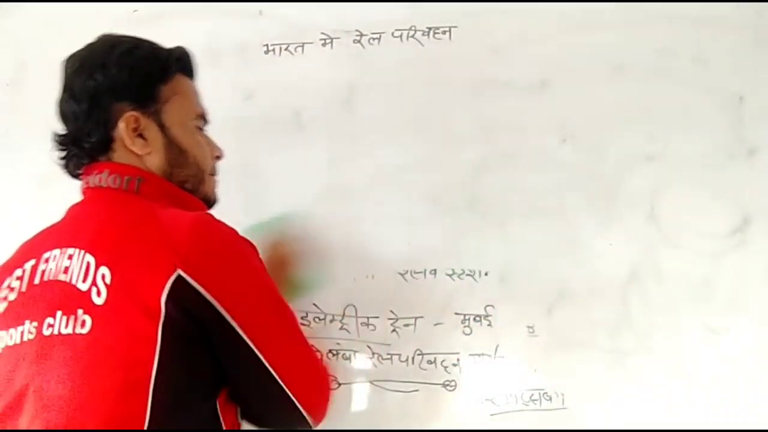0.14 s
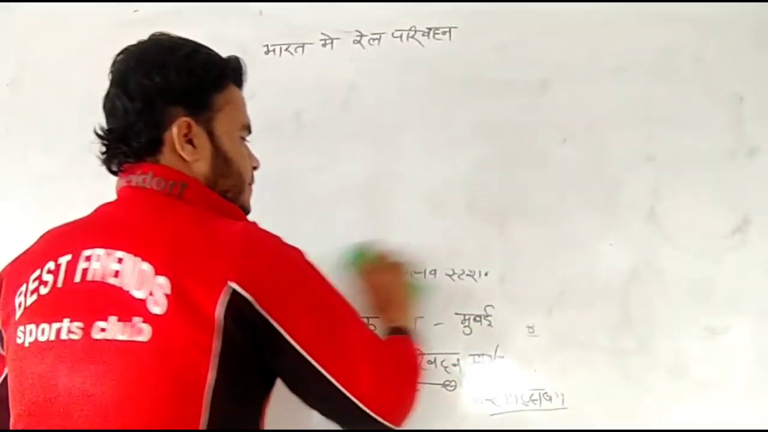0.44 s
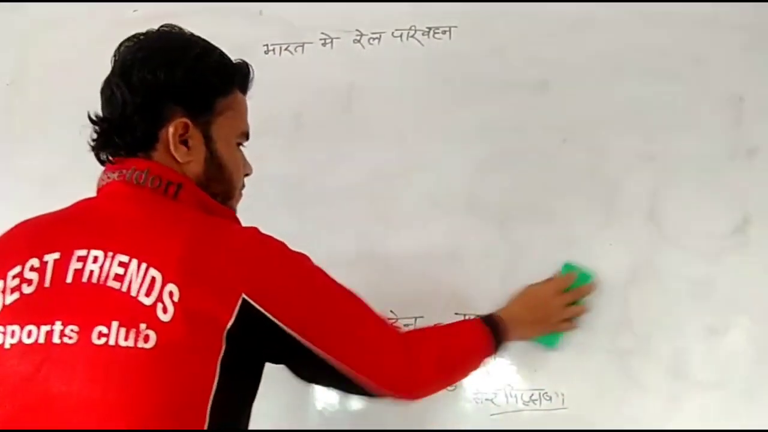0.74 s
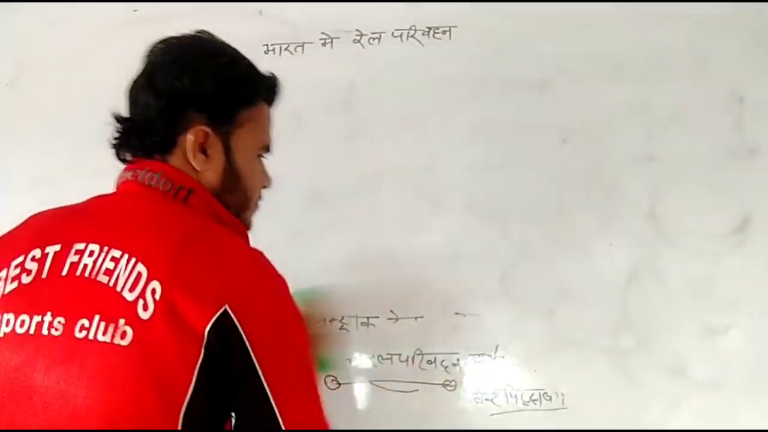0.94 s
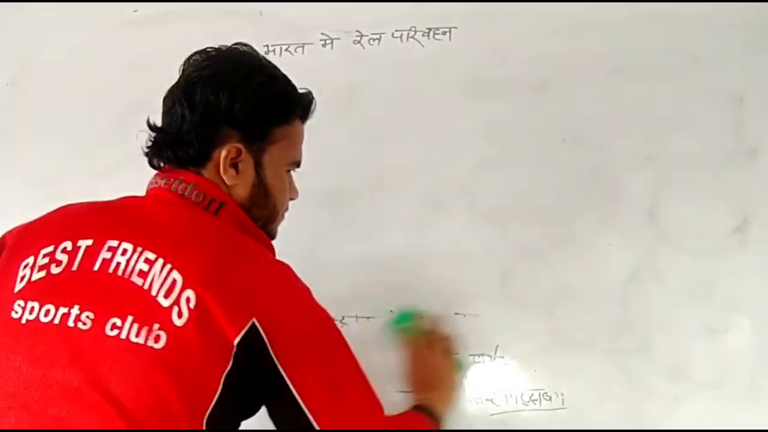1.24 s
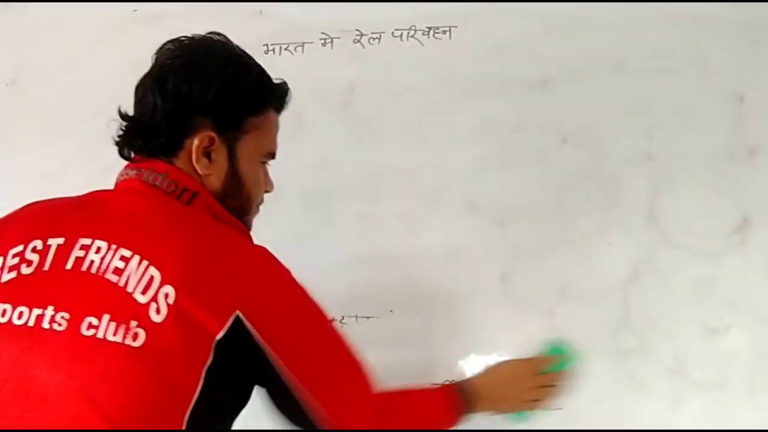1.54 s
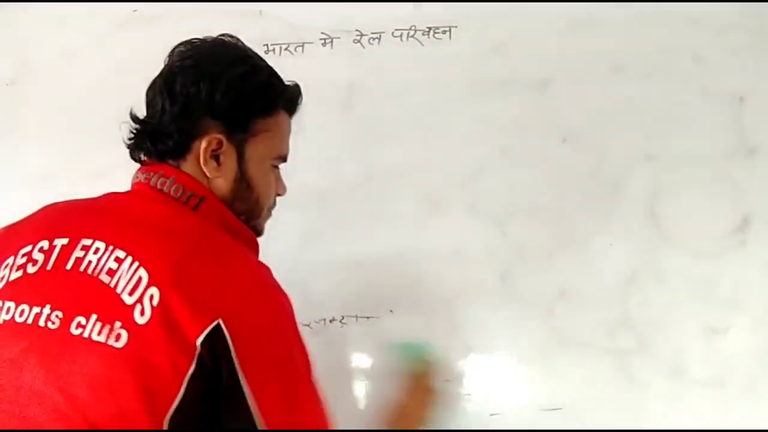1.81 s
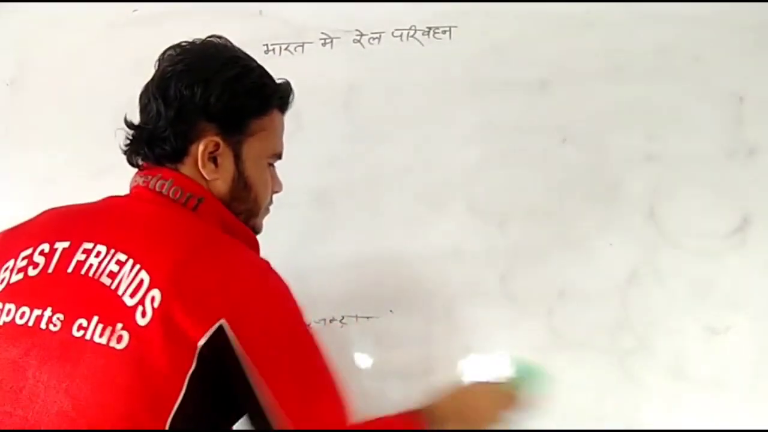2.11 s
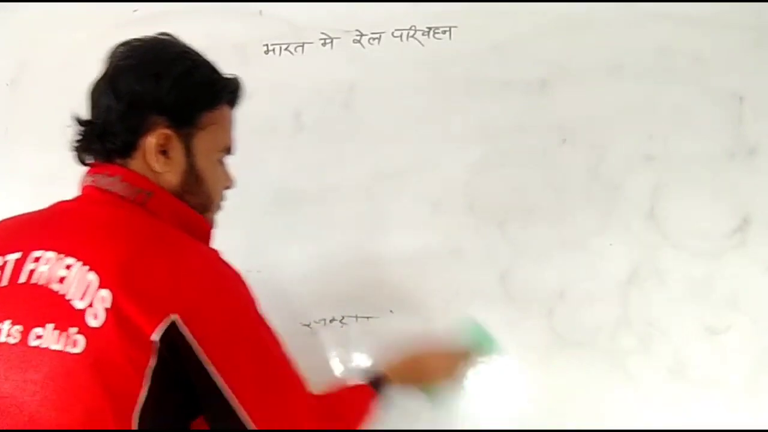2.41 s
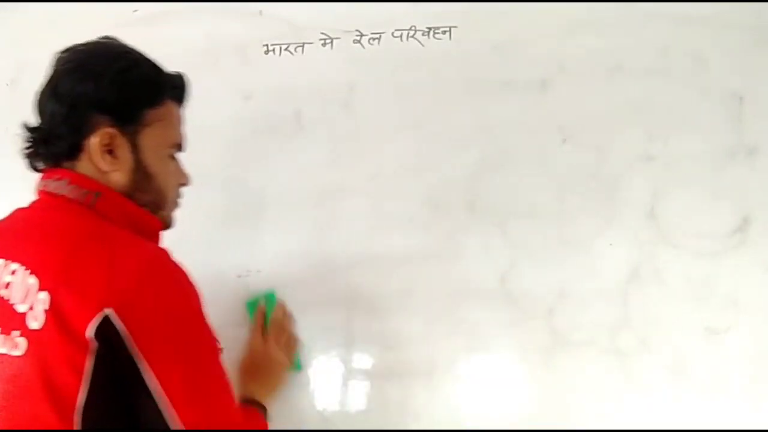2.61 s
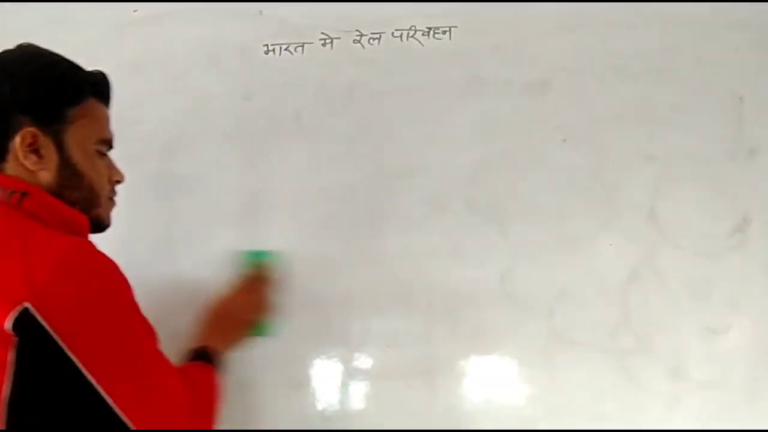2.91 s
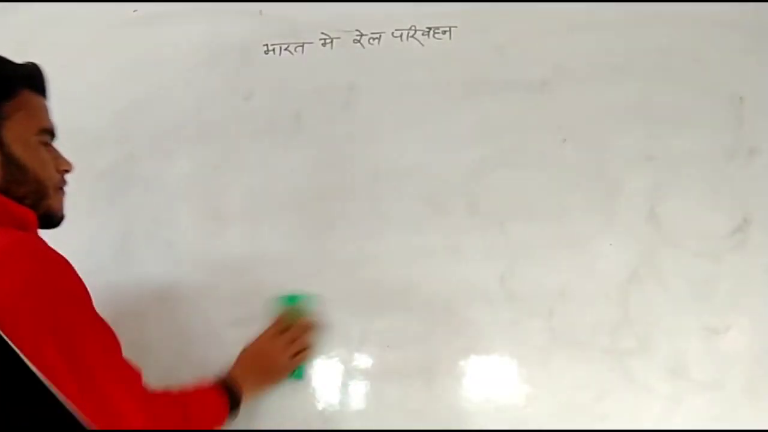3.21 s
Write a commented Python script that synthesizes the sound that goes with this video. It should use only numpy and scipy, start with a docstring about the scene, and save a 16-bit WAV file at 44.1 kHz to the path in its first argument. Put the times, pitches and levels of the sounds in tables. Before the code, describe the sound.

An eraser rubs back and forth on a whiteboard with light knocks at the turns.

```python
"""Erasing a whiteboard

A felt eraser is wiped back and forth in a small classroom. Friction noise swells and fades with the
speed of the hand: fibres catch and hiss, and the panel rumbles under them. The plastic holder knocks
at the turns, and gripping felt scuffs, squeaks and judders. Beneath it all lie a steady room tone
and moving air that buffets the microphone."""
import sys
import numpy as np
from scipy import signal
from scipy.fft import rfft, irfft
from scipy.io import wavfile
from scipy.ndimage import uniform_filter1d

SR = 44100
rng = np.random.default_rng(int(sys.argv[2]) if len(sys.argv) > 2 else 0)


def generate_wav(signal):
    """Clip the signal to [-1, 1] and save it as 16-bit WAV at the path in sys.argv[1]."""
    frames = np.transpose(np.atleast_2d(signal))
    scaled = np.clip(frames, -1, 1) * 32767
    pcm = np.round(scaled).astype(np.int16)
    wavfile.write(sys.argv[1], SR, pcm)


N = 147735


def undb(db):
    """Decibels to amplitude ratio."""
    return 10 ** (np.asarray(db) / 20)


def unit(x):
    """Normalise to an rms of 1."""
    return x / np.sqrt(np.mean(x ** 2))


def noise():
    """Gaussian white noise."""
    return rng.standard_normal(N)


def colour(x, points):
    """Spectral shaping by (frequency [Hz], gain [dB]) points; rms 1."""
    hz, db = np.array(points).T
    f = np.maximum(np.arange(N // 2 + 1) * SR / N, 1)
    gain = undb(np.interp(np.log(f), np.log(hz), db))
    return unit(irfft(rfft(x) * gain, N))


def resonance(x, hz, width_hz):
    """Two resonators in cascade give a steep-sided peak; rms 1."""
    b, a = signal.iirpeak(hz, hz / width_hz / np.sqrt(2), SR)
    return unit(signal.lfilter(b, a, signal.lfilter(b, a, x)))


def wander(per_s):
    """Linear interpolation between random values; rms 1."""
    hold = int(SR / per_s)
    steps = np.repeat(rng.standard_normal(N // hold + 1), hold)
    return unit(uniform_filter1d(steps, hold))[:N]


def swell(t, middle, half):
    """A Gaussian envelope."""
    return np.exp(-((t - middle) / half) ** 2 / 2)


def impact(t, at, decay_s, rise_s=0.00045):
    """A struck body's vibration builds during contact, then decays exponentially."""
    age = np.maximum(t - at, 0)
    return (1 - np.exp(-age / rise_s)) * np.exp(-age / decay_s)


def slips(per_s, spread_db):
    """Microscopic stick-slip: a Poisson train of impulses of random sign and size."""
    impulses = (rng.random(N) < per_s / SR) * np.sign(noise())
    size = np.minimum(rng.exponential(size=N), 2 * np.pi / np.sqrt(2))
    return impulses * undb(spread_db * size)


def wiping(t, turn_drop_db=24, swell_power=2.44, panel_share=0.46):
    """Sliding friction grows with speed: fibres hiss and excite the resonances of pad and panel."""
    # Hand strokes (start [s], fastest [s], end [s], hiss [dB], pad level [dB], pad resonance [Hz],
    # panel rumble [dB], panel ring [dB])
    strokes = [(-.2, -.06, 0.15, -62.5, -66.5, 4030, -51, -57.5),
               (.092, 0.229, 0.36, -52.5, -56.5, 4290, -53.5, -58),
               (0.365, 0.44, 0.92, -56.5, -71, 5460, -55, -59.5),
               (0.447, 0.573, .74, -63, -56, 4040, -58.5, -68),
               (0.902, 1.043, 1.16, -55, -58.5, 4240, -55, -61.5),
               (1.059, 1.32, 1.59, -57, -58.5, 3870, -58, -72),
               (1.628, 1.79, 1.89, -55, -61, 3840, -64.5, -74.5),
               (1.853, 1.947, 2.1, -54.5, -59, 3580, -60, -72.5),
               (2.139, 2.307, 2.3, -52.5, -57.5, 4120, -56.5, -71),
               (2.32, 2.414, 2.455, -62, -60.5, 3900, -68, -68),
               (2.461, 2.602, 2.77, -51, -56, 4080, -54.5, -68),
               (2.727, 2.845, 2.93, -62.5, -61, 4200, -62.5, -68),
               (2.883, 3.022, 3.233, -52.5, -58, 4400, -55.5, -69),
               (3.19, 3.302, 3.37, -60, -61.5, 4113, -63, -70)]
    # Spectrum of the fibre hiss (frequency [Hz], relative level [dB])
    felt_spectrum = [(900, -8.5), (1700, -3), (2100, -12), (2450, -11.5), (2900, -4.5), (3400, 3),
                     (4300, -5.5), (5300, 3), (6200, 1.5), (6800, 1), (7400, 0.5), (8000, -2.5)]
    # Response of the panel (frequency [Hz], relative level [dB])
    panel_spectrum = [(60, -10), (150, -3), (260, 0), (320, -2.5), (380, 4), (480, 0.5), (620, -5),
                      (730, -4), (900, -10.5), (1200, -9.5), (1800, -13), (2500, -16), (4000, -22)]
    fibres = colour(slips(per_s=14000, spread_db=3), felt_spectrum)
    pad, hiss_power, rumble_power, ring_power = np.zeros((4, N))
    for start, fastest, end, hiss_db, pad_db, pad_hz, rumble_db, ring_db in strokes:
        rise_s, fall_s = max(fastest - start, 0.01), max(end - fastest, 0.01)
        toward_turn = np.where(t < fastest, (fastest - t) / rise_s, (t - fastest) / fall_s)
        speed_db = -turn_drop_db * toward_turn ** swell_power
        hiss_power += undb(hiss_db + speed_db) ** 2
        rumble_power += undb(rumble_db + panel_share * speed_db) ** 2
        ring_power += undb(ring_db + panel_share * speed_db) ** 2
        pad += undb(pad_db + speed_db) * resonance(noise(), pad_hz, width_hz=1240)
    hiss = np.sqrt(hiss_power) * fibres
    rumble = np.sqrt(rumble_power) * colour(slips(per_s=770, spread_db=-1), panel_spectrum)
    grip = wander(per_s=70)  # uneven grip: hiss and rumble flutter in opposite directions
    ring = np.sqrt(ring_power) * resonance(noise(), hz=726.3, width_hz=40)
    return (pad + hiss) * undb(0.83 * grip) + rumble * undb(-0.5 * grip) + ring


def classroom(x, t, t60_s=0.44, tail_db=-8.5, delay_s=0.0039):
    """Reverberation: reflections from bare walls add a diffuse, exponentially decaying tail."""
    tail = noise() * undb(-60 * t / t60_s) * (t > delay_s)
    tail /= np.sqrt(np.sum(tail ** 2))
    return x + undb(tail_db) * signal.fftconvolve(x, tail)[:N]


def room_tone(level_db=-49.5):
    """Stationary background noise, strongest in the bass."""
    # Spectrum of the background (frequency [Hz], relative level [dB])
    spectrum = [(45, 10), (70, 11.5), (100, 2), (170, 1.5), (260, -0.5), (310, -3.5), (380, -5), (550, -8),
                (720, -6.5), (1050, -15.5), (1900, -15.5), (2600, -21), (4000, -25), (8000, -26.5)]
    return undb(level_db) * colour(noise(), spectrum)


def air(t, steady_db=-37.5):
    """Turbulence: slow, largely infrasonic pressure fluctuations buffet the microphone."""
    # Spectrum of the buffeting (frequency [Hz], relative level [dB])
    spectrum = [(2, -27.5), (5, 0.5), (8, 1), (14, -2), (25, -15.5), (35, -15.5), (50, -22.5), (80, -43.5),
                (160, -69.5)]
    # Gusts (centre [s], half length [s], rise above the steady air [dB])
    gusts = [(0.33, 0.069, 13.5), (1.08, 0.1, 10.5), (2.193, .14, 8), (2.572, 0.061, 4), (3.058, 0.026, 4)]
    gust_db = sum(db * swell(t, at, half) for at, half, db in gusts)
    return colour(noise(), spectrum) * undb(steady_db + gust_db)


def ticks(t):
    """Brief contacts of the holder's edge radiate dry, broadband transients."""
    # Edge contacts (time [s], level [dB], decay time [s])
    contacts = [(0.158, -42.5, 0.0025), (0.399, -47.5, 0.0044), (0.8668, -44, 0.0058),
                (1.169, -42.5, 0.0074), (2.136, -49, 0.0031), (2.17, -43, 0.0075), (2.324, -48, 0.00176),
                (2.511, -62, .004), (2.665, -44, 0.0016), (2.737, -47, .006), (2.8429, -44, 0.002),
                (2.895, -50, .001)]
    # Spectrum of a tick (frequency [Hz], relative level [dB])
    spectrum = [(800, 2.5), (2000, -2.5), (2700, -4), (3400, -3), (5000, -9.5), (8000, -14)]
    tick = colour(noise(), spectrum)
    return tick * sum(undb(db) * impact(t, at, decay_s) for at, db, decay_s in contacts)


def knocks(t):
    """Impact excitation: the rocking holder clacks as a damped oscillator and the panel thuds."""
    # Blows of the holder (time [s], clack level [dB], pitch [Hz], clack decay [s], thud level [dB])
    blows = [(.162, -38.5, 960, 0.0015, -43.5), (0.306, -44, 375, 0.02, -40.5),
             (.399, -40, 830, 0.0011, -53.5), (0.8729, -32.5, 835, 0.0017, -45.5),
             (1.075, -43, 860, .003, -49.5), (1.377, -36, 765, 0.0018, -45), (1.541, -43, 825, 0.0034, -46),
             (1.9195, -33, 695, 0.0017, -56), (2.172, -39.5, 833, 0.0026, -51.5),
             (2.185, -36.5, 399, 0.0051, -55.5), (2.3252, -25, 980, 0.00057, -61),
             (2.439, -43, 774, 0.0034, -43), (2.5105, -34, 630, 0.0011, -42.5),
             (2.668, -38, 1520, 0.00077, -58.5), (2.738, -46.5, 1665, 0.0039, -47.5),
             (2.8438, -40.5, 1550, 0.0012, -43)]
    # Spectrum of the struck panel (frequency [Hz], relative level [dB])
    thud_spectrum = [(50, -0.5), (110, -2.5), (250, -1.5), (380, 2), (470, -3), (600, -3.5), (800, -6.5),
                     (1200, -18), (3000, -25.5)]
    thud = colour(noise(), thud_spectrum)
    out = np.zeros(N)
    for at, clack_db, hz, decay_s, thud_db in blows:
        out += undb(clack_db) * np.sin(2 * np.pi * hz * (t - at)) * impact(t, at, decay_s)
        out += undb(thud_db) * thud * impact(t, at, decay_s=0.018, rise_s=0.0005)
    return out


def squeaks(t):
    """Irregular stick-slip of gripping felt: narrow-band noise about a steady or gliding pitch."""
    # Scuffs and squeaks (centre [s], half length [s], pitch [Hz], glide [Hz/s], width [Hz], level [dB])
    scuffs = [(0.337, 0.0071, 1810, 0, 353, -56.5), (.46, 0.064, 2440, 3003, 605, -62.5),
              (.75, 0.028, 1838, 0, 800, -62.5), (0.878, 0.0027, 3430, 0, 348, -58),
              (1.15, .028, 1930, -2000, 400, -58), (1.483, 0.046, 1746, 3500, 450, -61),
              (2.008, 0.022, 1758, 5501, 340, -56.5), (2.735, 0.0021, 2380, 0, 306, -53.5),
              (3.072, 0.0019, 6600, 4, 405, -45), (3.078, 0.00086, 6800, 0, 1180, -44)]
    out = np.zeros(N)
    for at, half, hz, glide, width_hz, db in scuffs:
        lowpass = signal.butter(2, width_hz / 2, fs=SR, output="sos")
        wobble = signal.sosfilt(lowpass, noise() + 1j * noise())
        cycles = (hz + glide * (t - at) / 2) * (t - at)
        band = unit(np.real(wobble * np.exp(2j * np.pi * cycles)))
        out += undb(db) * swell(t, at, half) * band
    return out


def judders(t):
    """Friction-induced vibration: the gripping pad shakes for a few low, unsteady cycles."""
    # Shakes of the pad (centre [s], half length [s], pitch [Hz], level [dB])
    shakes = [(.6, .015, 168, -51), (.895, 0.012, 133, -51), (1.858, 0.029, 102, -52),
              (2.248, 0.022, 91, -46.5), (3.051, 0.017, 139, -50.5), (3.073, 0.0067, 213.3, -45.5)]
    out = np.zeros(N)
    for at, half, hz, db in shakes:
        phase = 2 * np.pi * hz * (t - at) + wander(per_s=60)
        out += undb(db) * swell(t, at, half) * unit(np.sin(phase))
    return out


def scene():
    """Superposition of the reverberant eraser, room tone and moving air, in mono."""
    t = np.arange(N) / SR
    eraser = wiping(t) + knocks(t) + ticks(t) + squeaks(t) + judders(t)
    return (classroom(eraser, t) + room_tone() + air(t))[None]


def record(dry, fade_s=0.004, top_hz=7550, stop_hz=8750, stop_db=-55):
    """Band limiting: a steep low-pass removes the top treble; both ends fade briefly."""
    t = np.arange(N) / SR
    fade = np.sin(np.pi / 2 * np.clip(np.minimum(t, t[-1] - t) / fade_s, 0, 1)) ** 2
    f = np.arange(N + 1) * SR / (2 * N)
    transition = np.clip((f - top_hz) / (stop_hz - top_hz), 0, 2)
    lowpass = undb(stop_db * transition ** 1.3)
    return irfft(rfft(dry * fade, 2 * N) * lowpass, 2 * N)[:, :N]


dry = scene()
out = record(dry)
generate_wav(out)
```